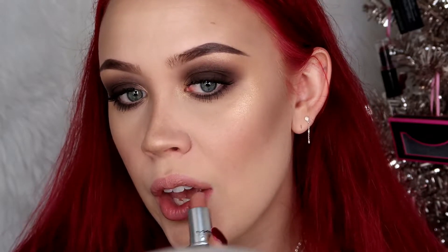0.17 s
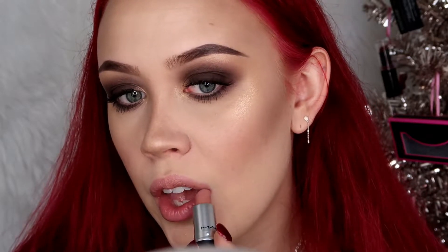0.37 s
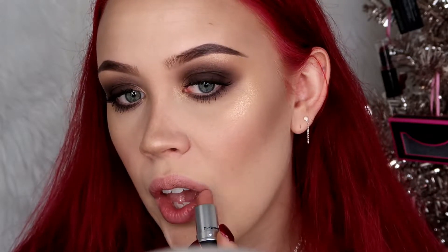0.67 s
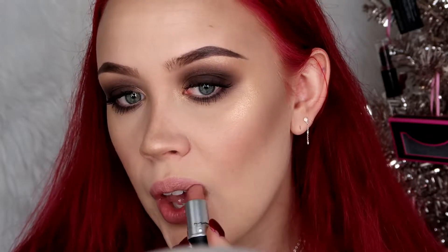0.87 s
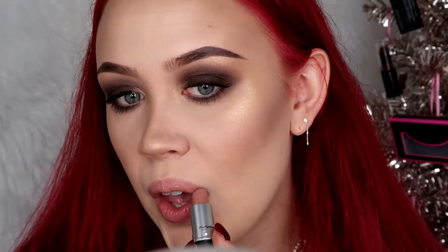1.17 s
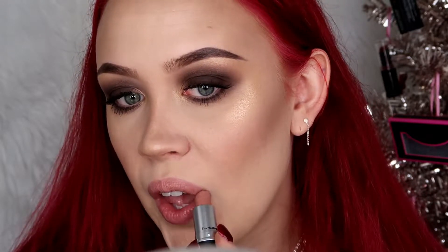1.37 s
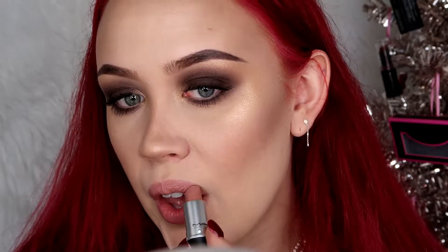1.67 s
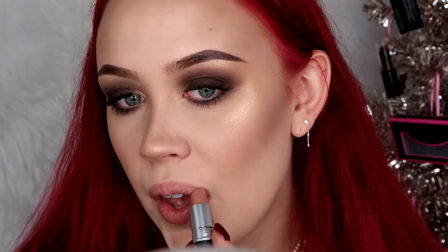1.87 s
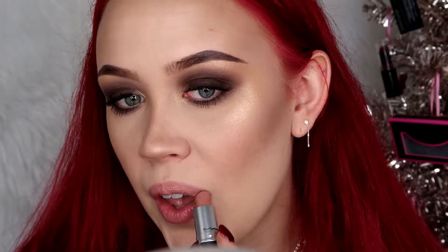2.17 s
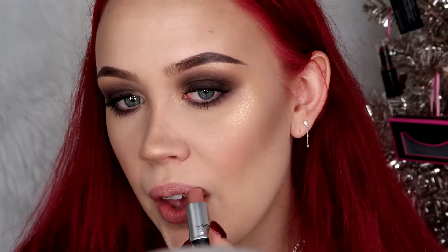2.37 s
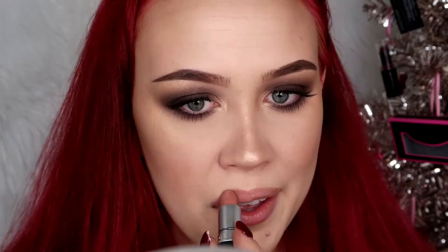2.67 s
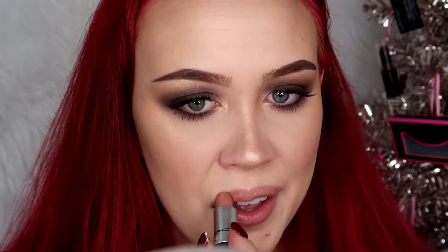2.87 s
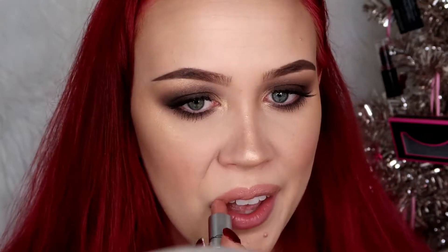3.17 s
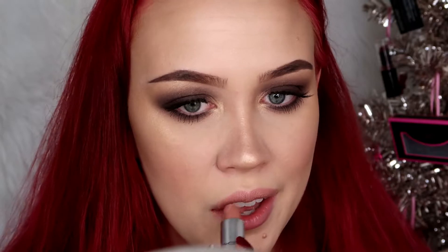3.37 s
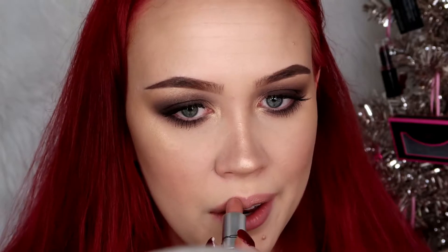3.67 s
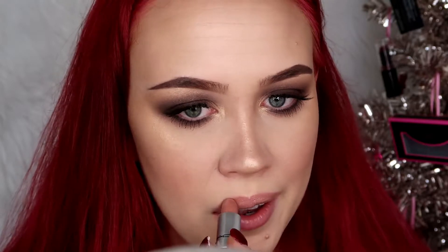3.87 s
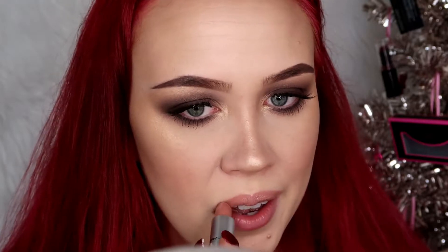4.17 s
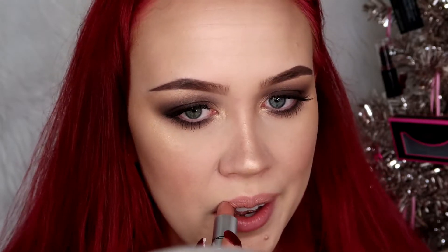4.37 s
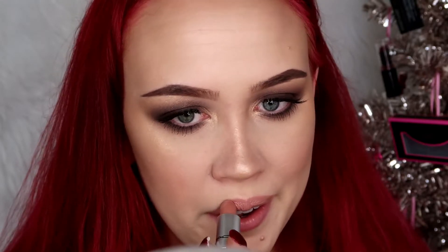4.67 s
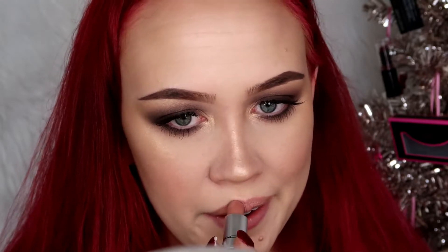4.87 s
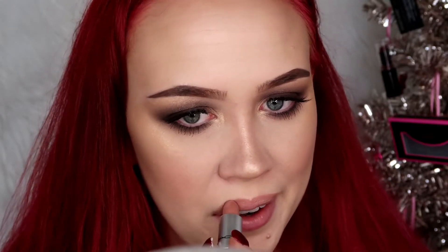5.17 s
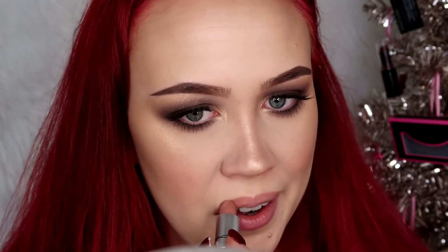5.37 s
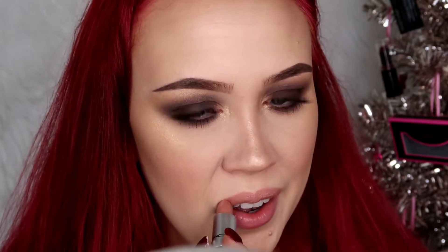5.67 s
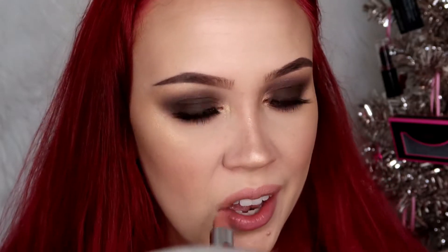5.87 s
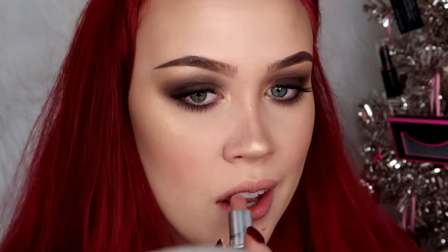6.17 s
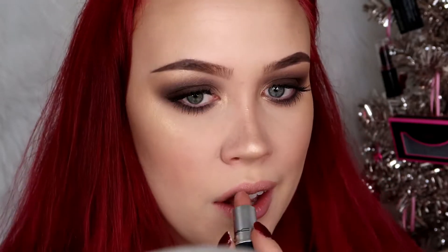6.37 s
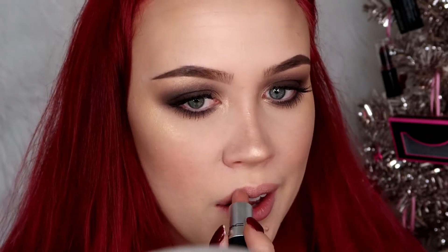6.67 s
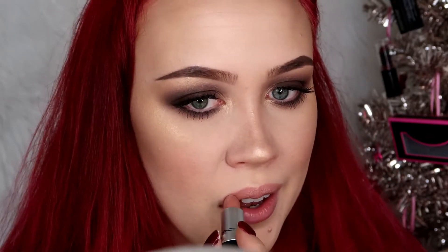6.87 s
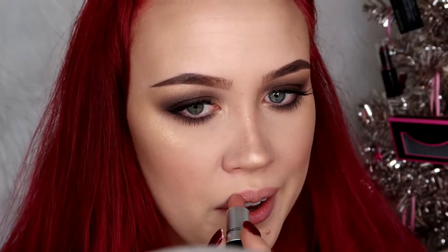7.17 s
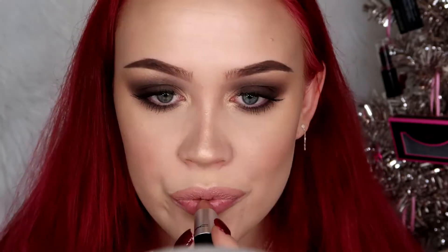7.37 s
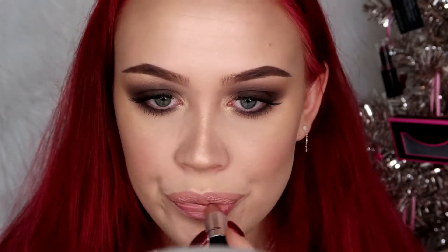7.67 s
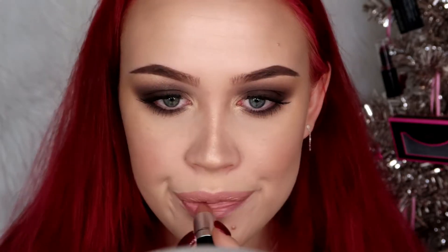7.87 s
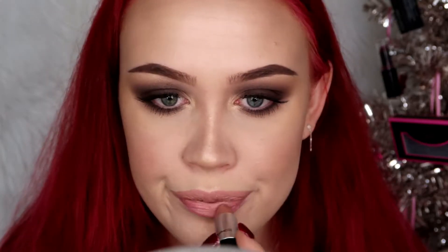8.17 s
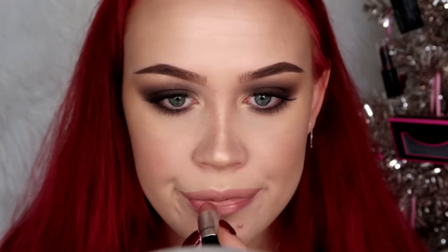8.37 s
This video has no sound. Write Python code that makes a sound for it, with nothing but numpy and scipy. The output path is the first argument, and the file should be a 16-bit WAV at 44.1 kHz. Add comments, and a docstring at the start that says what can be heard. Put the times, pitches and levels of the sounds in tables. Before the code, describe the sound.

A hushed indoor background of soft rumble, far-off machine drone and steady hiss shifts at two hard cuts; no distinct action sounds.

```python
"""An engine idling far outside, a second machine droning and a rumbling house, heard in a quiet room.
The place plays in three pieces joined by hard cuts; engine and drone are gone from the last.
Machines are sums of slowly drifting multiples of a rate, house and hiss are coloured noise, hums are sines.
The camera's built-in microphones add hiss; its frame clock adds a buzz, bright puffs and a gated whine."""
import sys
import numpy as np
from scipy import signal
from scipy.fft import rfft, irfft, next_fast_len
from scipy.io import wavfile
from scipy.ndimage import map_coordinates

SR = 44100
rng = np.random.default_rng(int(sys.argv[2]) if len(sys.argv) > 2 else 0)


def store_wav(level_fs):
    """Save 16-bit WAV to argv[1]."""
    pcm = np.round(np.clip(np.atleast_2d(level_fs), -1, 1) * 32767)
    wavfile.write(sys.argv[1], SR, pcm.T.astype(np.int16))


def natural_amplitude(level_db):
    """Convert a level in decibels to a linear amplitude factor, elementwise."""
    exponent = np.asarray(level_db, float) / 20
    return 10 ** exponent


N = 375291
T = np.arange(N) / SR
FRAME_HZ = 30000 / 1001

# start of each piece: t/s
PIECE_START = [0, 2.60932, 7.32932]
# wave jump at each cut: (level of half the jump/dB, direction)
CUT_JUMPS = [(-39, 1), (-44, -1)]

# engine far outside, cycle rate: (t/s, f/Hz)
IDLE_RATE = [(0, 9.04), (2.6, 9.02), (2.61, 8.95), (4, 8.925), (6.3, 8.92), (7.33, 8.89)]
# multiples of the cycle that come through the walls
ORDERS_HEARD = [8, 9, 10, 11, 12, 13, 14, 15]
# each multiple: (first piece: level at its start/dB, drift/dB per s; second piece: the same two)
ENGINE_LEVELS = [(-56.5, 1.5, -53.5, -.7), (-64, 6.5, -58, -.2), (-64, 1.5, -59, -3),
                 (-41.5, -.01, -53, -.6), (-65, 3, -80, -.1), (-61, 5.8, -62, -1.8), (-66, 3.8, -80, -.1),
                 (-80, -.1, -62, -2.6)]
# in the first piece the strongest multiple also falls away on both sides of a crest
STRONGEST, CREST_S, SINK_DB_PER_S2 = 11, 1.15, 2.7

# droning machine, higher after the first cut: (t/s, f/Hz)
DRONE_PITCH = [(.5, 30.7), (1.5, 31.3), (2, 30.7), (2.6, 30.7), (2.61, 53.6), (4, 54), (6, 54.5), (7, 54.7)]
# first piece: fundamental; second piece: fundamental and octave, before the fade
DRONE_DB, FAST_DB, OCTAVE_DB = -52.6, -56, -48.3
# late in the second piece both fade away
FADE_S, FADE_DB_PER_S, OCTAVE_FADE_DB_PER_S = 6.15, 12, 26

# room background: (t/s, rumble level/dB, air level before trim and flutter/dB)
HOUSE_LEVELS = [(0, -47.5, -66), (1, -50.5, -67), (2.6, -45, -67), (2.61, -48, -58), (3.6, -49.5, -61.5),
                (4.6, -50, -68), (6.3, -49, -63), (7.32, -49.5, -62), (7.34, -47.5, -62), (8.51, -45, -61)]
# noise colours, each later scaled as a whole: (f/Hz, relative level/dB)
RUMBLE_COLOUR = [(12, -30), (19, -3), (27, -8), (38, -5.5), (48, -7), (62, -3), (81, -3), (97, -0.5),
                 (115, -4), (140, -13.5), (173, -18.5), (220, -29)]
AIR_COLOUR = [(120, -31), (170, -1.5), (230, -6.5), (315, -6.5), (345, -5), (385, -1.5), (470, -10.5),
              (560, -22.5), (620, -12), (665, -5.5), (720, -15), (950, -17), (1500, -33)]
HISS_COLOUR = [(24, -60), (40, -38), (98, -19.5), (183, -0.5), (270, 0.5), (470, -1), (530, -4.5),
               (1000, -7), (1700, -9), (3800, -14), (7000, -21.5), (11500, -30.5), (12500, -29.5),
               (13100, -33)]
PUFF_COLOUR = [(500, -20), (1500, -4), (3000, -4.5), (4300, 1.5), (5500, -8.5), (10000, -20), (12500, -30)]
# brief soft hums in the room, the last three low swells of the house rumble: (t of crest/s, f/Hz, rms level at
# crest/dB, length/s)
HUMS = [(.33, 168, -56, .3), (.63, 172, -62, .35), (2.12, 172, -59, .3), (2.15, 200, -56, .15),
        (2.12, 436, -59, .12), (2.16, 236, -59, .18), (4.2, 167, -56, .3), (5.2, 200, -61, .2),
        (5.95, 167, -56, .4), (7.57, 80, -46, .12), (7.83, 96, -43, .12), (8.4, 84, -47, .2)]

# where in the frame the main current step falls, for each piece: (place/frames)
STEP_PLACE = [.005, .41, .125]
# current steps in each frame: (place from the main step/frames, signed size)
CURRENT_STEPS = [(-.225, -.5), (-.155, .9), (-.08, -.45), (.005, -1), (.505, .4)]
# ringing of the supply after a step of size 1, before its soft onset: (f/Hz, peak level/dB, t60/s)
SUPPLY_RING = [(64, -58, .06), (179, -63, 0.1), (300, -52, .025), (457, -62.5, 0.027), (640, -58.5, 0.0076)]
# readout puff in each piece, before surge and flutter: (level/dB)
READOUT_LEVELS = [-75, -63.5, -59.5]
# the puff is louder just after the first cut; time constant of its settling
SURGE_DB, SETTLE_S = 9, .35


def piece():
    """Number of the piece that plays at each sample."""
    return np.searchsorted(PIECE_START, T, "right") - 1


def during(number):
    """1 while that piece plays, else 0."""
    return piece() == number


def unit(x):
    """Scaled to rms 1."""
    return x / np.sqrt(np.mean(x ** 2))


def curves(rows):
    """One value per sample for each column after the time."""
    s, *cols = np.transpose(rows)
    return [np.interp(T, s, col) for col in cols]


def wobble(rate):
    """A smooth random curve, rate knots a second."""
    knots = rng.standard_normal(int(N * rate / SR) + 4)
    return map_coordinates(knots, [T * rate])


def noise(colour):
    """Noise of rms 1 coloured by (f/Hz, level/dB) points, joined on a logarithmic frequency axis."""
    size = next_fast_len(N + 8192)
    hz, db = np.transpose(colour)
    bins_hz = np.fft.rfftfreq(size, 1 / SR)
    gain = natural_amplitude(np.interp(np.log(bins_hz + 1), np.log(hz + 1), db, -120, -120))
    spectrum = rfft(rng.standard_normal(size)) * gain
    return unit(irfft(spectrum, size)[:N])


def tones(rate, orders, levels, start):
    """Multiples of a slowly moving rate that line up once a cycle, each wavering; start in cycles."""
    turn = 2 * np.pi * (np.cumsum(curves(rate)[0]) / SR + start)
    out = 0
    for order, db in zip(orders, levels):
        level = np.sqrt(2) * natural_amplitude(db + .8 * wobble(4.3))
        out = out + level * np.cos(order * turn + 1.15)  # shared phase, radians
    return out


def frame_clock():
    """Frames counted from the main current step; the count jumps at each cut."""
    return T * FRAME_HZ - np.take(STEP_PLACE, piece())


def window(centre, width, edge):
    """1 around one place in every frame, with sloping edges; all in frames."""
    away = np.abs((frame_clock() - centre + .5) % 1 - .5)
    return np.clip((width / 2 - away) / edge + .5, 0, 1)


def engine():
    """The distant idle: multiples of its cycle rate through the walls, in the first two pieces."""
    first_db = [db + drift * T for db, drift, _, _ in ENGINE_LEVELS]
    second_db = [db + drift * (T - PIECE_START[1]) for _, _, db, drift in ENGINE_LEVELS]
    first_db[ORDERS_HEARD.index(STRONGEST)] -= SINK_DB_PER_S2 * (T - CREST_S) ** 2
    first = tones(IDLE_RATE, ORDERS_HEARD, first_db, .28)
    second = tones(IDLE_RATE, ORDERS_HEARD, second_db, .687)
    return during(0) * first + during(1) * second


def drone():
    """The second machine: one low tone, then a higher one with its octave that fades away."""
    late = np.maximum(T - FADE_S, 0)
    second_db = [FAST_DB - FADE_DB_PER_S * late, OCTAVE_DB - OCTAVE_FADE_DB_PER_S * late]
    first = tones(DRONE_PITCH, [1], [DRONE_DB], .47)
    second = tones(DRONE_PITCH, [1, 2], second_db, 0)
    return during(0) * first + during(1) * second


def house():
    """Low rumble and a dull rush of air: coloured noises, the air fluttering slowly and quickly."""
    rumble_db, air_db = curves(HOUSE_LEVELS)
    flutter_db = 2.4 * wobble(2.69) + 2.4 * wobble(14)
    rumble = natural_amplitude(rumble_db) * noise(RUMBLE_COLOUR)
    air = natural_amplitude(air_db - 1.1 + flutter_db) * noise(AIR_COLOUR)
    return rumble + air


def buzz():
    """Current steps of the frame cycle leak into both channels alike and ring the supply."""
    t = T[:SR // 10]
    ring = sum(natural_amplitude(db - 60 * t / t60) * np.cos(2 * np.pi * hz * t) for hz, db, t60 in SUPPLY_RING)
    ring *= 1 - np.exp(-t / .0003)  # soft onset
    kicks = 0
    for place, size in CURRENT_STEPS:
        passed = np.diff(np.floor(frame_clock() - place), prepend=0) == 1
        kicks = kicks + size * passed
    return signal.fftconvolve(kicks, ring)[:N]


def hiss():
    """Each microphone preamplifier hisses by itself, a little of it mirrored in the other channel."""
    left, right = noise(HISS_COLOUR), noise(HISS_COLOUR)
    both = np.array([left - 0.047 * right, right - 0.044 * left])
    return natural_amplitude(-53.0 + 0.32 * wobble(7)) * both


def readout_puff():
    """A bright puff of noise at each sensor readout, independent in the two channels."""
    surge_db = during(1) * SURGE_DB * np.exp(-np.abs(T - PIECE_START[1]) / SETTLE_S)
    level = natural_amplitude(np.take(READOUT_LEVELS, piece()) + surge_db + 2.5 * wobble(25))
    gate = window(-0.329, 0.089, .04)
    return level * gate * np.array([noise(PUFF_COLOUR), noise(PUFF_COLOUR)])


def whine():
    """A line-rate tone, 434 cycles a frame, that nearly drops out once a frame."""
    gate = 1 - .9 * window(-.095, .3, .11)
    turn = 2 * np.pi * 434 * frame_clock()
    lead = [[2.0], [0]]  # left channel ahead, radians
    return natural_amplitude(-72.5) * gate * np.sin(turn + lead)


def hums():
    """Brief sines in the room that swell and fade along a bell curve."""
    out = np.zeros(N)
    for s, hz, db, length in HUMS:
        swell = np.exp(-.5 * ((T - s) / (length / 3.6)) ** 2)
        out += np.sqrt(2) * natural_amplitude(db) * swell * np.sin(2 * np.pi * hz * T)
    return out


def cuts():
    """A hard cut makes the wave jump: a step that leaks away on both sides."""
    out = np.zeros(N)
    for s, (db, way) in zip(PIECE_START[1:], CUT_JUMPS):
        leak = np.exp(-np.abs(T - s) / .0015)
        out += natural_amplitude(db) * way * np.sign(T - s) * leak
    return out


def scene():
    """Machines, house, hums and buzz are equal at both microphones; hiss, puff and whine differ."""
    same = engine() + drone() + house() + buzz() + hums()
    return same + hiss() + readout_puff() + whine()


def top_cut(x):
    """Nothing passes above the cut-off."""
    return signal.sosfilt(signal.butter(12, 13380, fs=SR, output="sos"), x)


def record(dry):
    """Adds the jumps at the cuts and a small constant offset."""
    mix = dry + cuts() + .0004
    return top_cut(mix)


dry = scene()
out = record(dry)
store_wav(out)
```